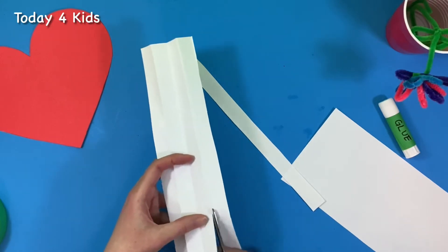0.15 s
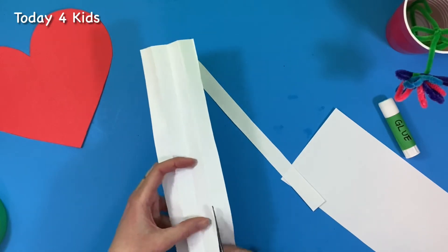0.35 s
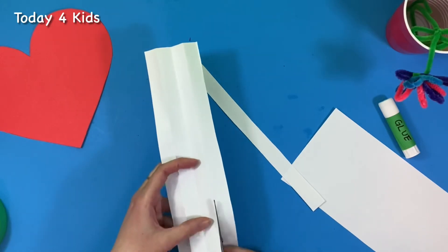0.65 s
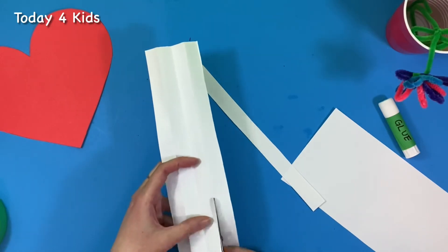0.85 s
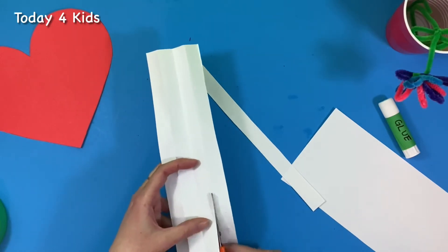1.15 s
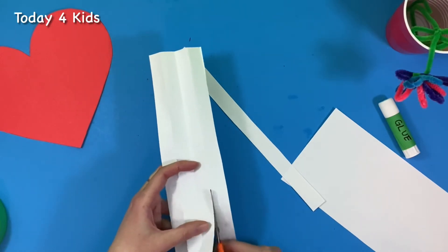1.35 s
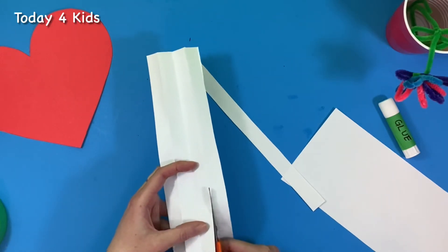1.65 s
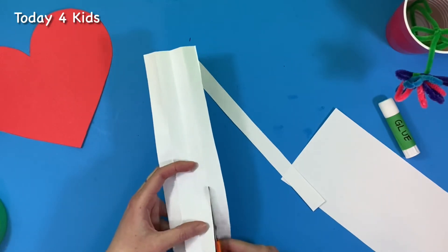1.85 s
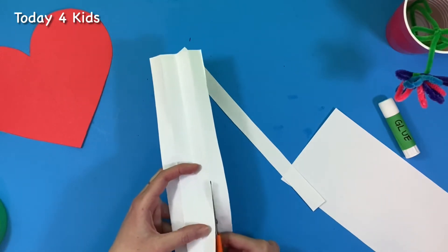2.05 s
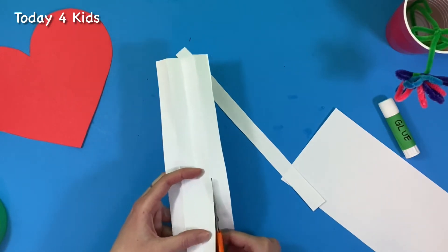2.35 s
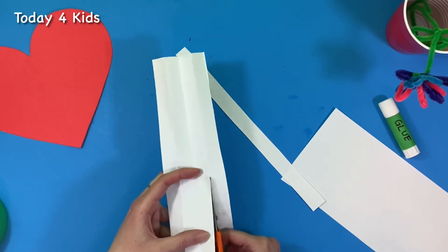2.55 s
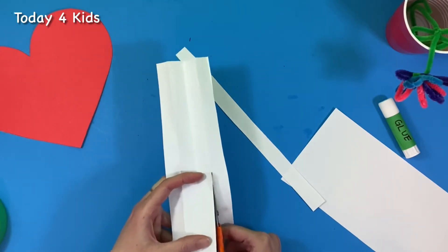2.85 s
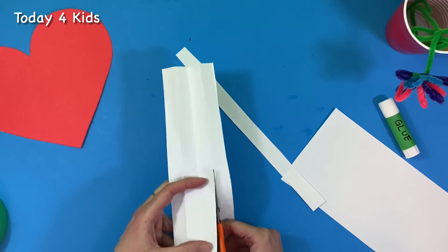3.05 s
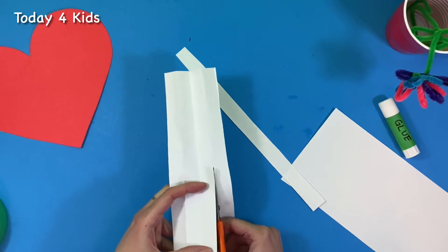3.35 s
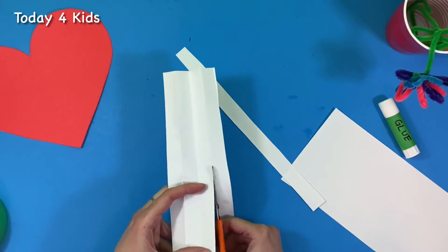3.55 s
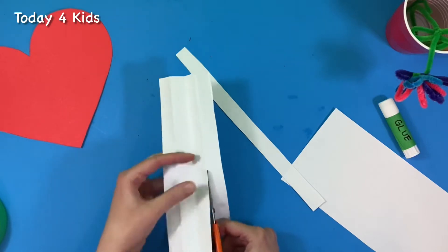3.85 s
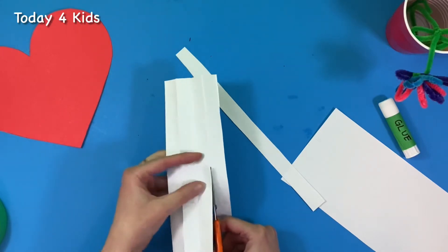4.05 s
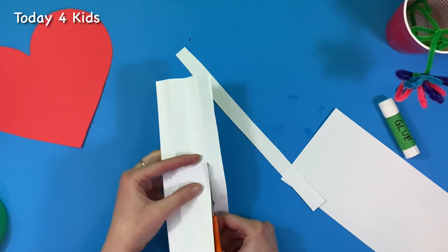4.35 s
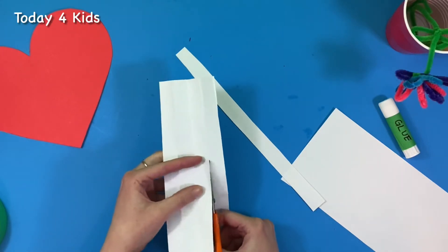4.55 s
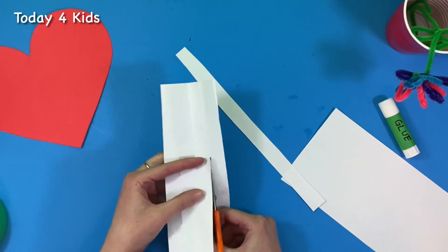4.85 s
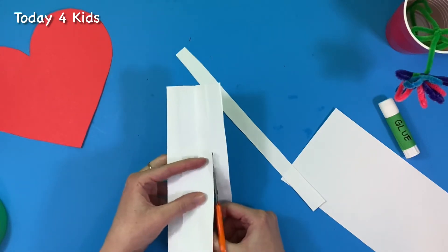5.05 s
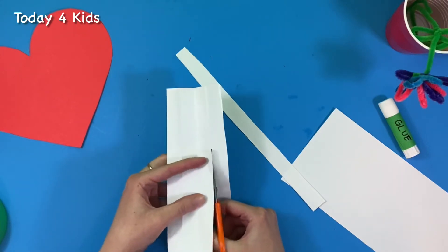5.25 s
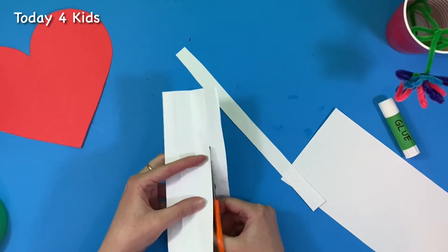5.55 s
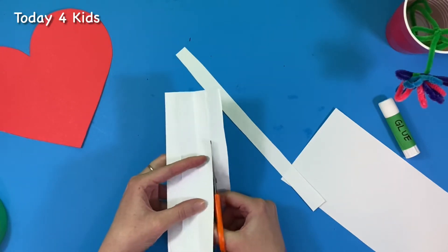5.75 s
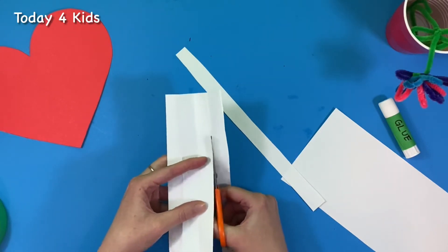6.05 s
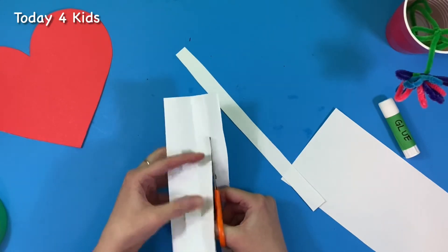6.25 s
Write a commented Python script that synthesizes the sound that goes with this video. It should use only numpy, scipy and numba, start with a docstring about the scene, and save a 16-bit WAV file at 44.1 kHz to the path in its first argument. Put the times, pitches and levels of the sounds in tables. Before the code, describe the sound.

A close, dry stereo sound of scissors working through stiff folded paper on a table in a small room, over faint low rumble. At 0-0.5 s, paper slides and ticks under fingers, then a crunchy cut follows at about 0.5-0.65 s. Crisp snaps gather from 0.8 s, with the loudest crack and a light knock near 1.24 s. From 1.4 to 3.4 s, cuts come nearly three a second: gritty, crackling closes of about a tenth of a second alternate with scratchy openings, and a bright pop lands at 2.3 s. Around 3.45-4.05 s cutting pauses for rustling, soft finger pats and a small knock at 3.7 s. A very short hard snap at 4.05 s leads into renewed cutting, with another at 4.44 s. A deep, soft table thump sounds near 5.15 s, with small edge clicks following. The last cut ends near 5.96 s, leaving light paper sliding until 6.3 s.

```python
"""Scissors cut a strip of folded paper: the blades shear shut through the fibres, then rub open again, about
three times a second. Each stroke is a filtered stream of fibre breaks, with surges where bundles give way.
Stiff folds snap as ragged bursts, the blade edge clicks, paper slides under the fingers and fingertips pat it.
A few knocks boom in the table as decaying modes, over low rumble and faint air noise in a small room.
Two close microphones hear it in stereo."""
import sys
import numpy as np
from scipy import signal
from scipy.fft import rfft, irfft
from scipy.io import wavfile
from scipy.ndimage import uniform_filter1d
from numba import njit

SR = 44100
rng = np.random.default_rng(int(sys.argv[2]) if len(sys.argv) > 2 else 0)


def log_audio(samples):
    """Write samples as a 16-bit WAV file to the path given in sys.argv[1]."""
    # one column per channel
    frames = np.atleast_2d(samples).T
    # limit to full scale, then quantise
    limited = np.clip(frames, -1, 1)
    pcm = np.round(limited * 32767).astype(np.int16)
    wavfile.write(sys.argv[1], SR, pcm)


N = 281666

# All event levels are relative; the stroke trims and the final mix act on them.
# Rumble of the room. Each row: time in seconds, level in dB.
RUMBLE_LEVEL = [(0, -59.5), (2.849, -57.5), (3.0, -69), (3.75, -59), (4.999, -68), (5.35, -52.5),
                (5.75, -70.5), (6.39, -58.5)]
# Spectra of the rumble and of the quiet air. Each row: frequency in Hz, gain in dB.
RUMBLE_SPECTRUM = [(25, -18.5), (55, 1), (75, -4), (97, 0), (140, -14.5), (300, -32.5), (1000, -42)]
AIR_SPECTRUM = [(30, -16), (150, -1.5), (400, -10), (1000, -17.5), (4000, -20.5), (15000, -26)]
AIR_DB = -65
# Modes of the table top. Each row: frequency in Hz, level in dB, 60 dB decay time in seconds.
TABLE_MODES = [(55.8, -38, 0.46), (67, -56, .4), (95.5, -48, 0.42), (103, -25.5, 0.14), (186, -35.5, 0.088)]
# Knocks that reach the table. Each row: start in seconds, level in dB, duration of the push in seconds.
TABLE_KNOCKS = [(1.242, -12.5, 0.0027), (3.712, -12, 0.01), (5.146, 10.5, 0.037)]
# Resonances of paper and scissors over the table. Each row: frequency in Hz, width in Hz, level in dB.
BODY_RESONANCES = [(758, 89, -6.5), (982, 25, -9), (1196, 72, 3), (1717, 43, -2), (1970, 140, -3),
                   (3282, 430, -3.5), (3940, 130, -4)]
# Phase by which the left microphone leads. Each row: frequency in Hz, phase in radians.
LEFT_PHASE_LEAD = [(0, 0), (400, -.2), (900, -.7), (1150, -.2), (1900, .1), (2700, .4), (4400, .35),
                   (5100, .1), (6900, 2.95), (8100, 3.35), (9730, 6.1), (11300, 6.5), (12500, 9.2),
                   (14400, 9.6), (15800, 12.5)]
TOP_HZ = 15900

# Fingers patting the paper on the table. Each row: start in seconds, level in dB, decay in ms, ring in Hz.
FINGER_PATS = [(3.7, -31, 6, 750), (3.7094, -24, 4.6, 380), (3.713, -23, 8.2, 840), (3.722, -33, 10, 990),
               (3.7422, -33.5, 4.3, 1150)]
# Paper sliding under the fingers, and the scrape that trails the big snap at 1.24 s. Each row: start in
# seconds, end in seconds, level in dB, change by the end in dB, ring in Hz, ring level in dB, body level in dB.
PAPER_SLIDES = [(0.128, 0.264, -41.5, 4, 1050, 3, 6), (0.301, 0.465, -35.5, -17.5, 700, 18, -8.5),
                (1.249, 1.355, -24, -31, 4310, 8, -2), (3.451, 3.5, -44.5, 3, 900, -10, 6),
                (3.495, 3.507, -27.5, 2, 2260, 7, -6), (3.534, 3.713, -47, 8, 3600, -11, -29),
                (3.767, 3.881, -44, 12.5, 1850, 7, 2.5), (3.89, 4.092, -35, -5, 950, 13, 1),
                (5.992, 6.233, -37, 0, 825, -4, -5), (6.281, 6.318, -41.5, 2, 1960, -30, 1)]
# Edge catching on a crease. Each row: start in seconds, level in dB.
EDGE_CLICKS = [(0.521, -29), (3.387, -36), (3.4044, -30), (3.42, -24.5), (4.877, -28.5), (5.2197, -25),
               (5.2444, -23), (5.551, -24.5)]
# Snaps of folds and taps on the paper. Each row: start in seconds, level in dB, decay in ms,
# body level in dB, edge level in dB, ring in Hz, ring level in dB.
FOLD_SNAPS = [(.146, -29, 7.2, 6.5, -1, 920, 14), (.169, -29, 1.4, 4, -15, 960, 6),
              (0.2216, -22.5, 6.6, 3.5, 6, 3200, 5), (0.267, -31, 2.8, 7, 0, 700, 5),
              (0.303, -33, 5, 8, 3, 694, 22), (0.332, -27, 1.44, 18, 5, 3250, 10),
              (0.47, -33, 8.7, -6, 6.5, 3370, -16), (0.558, -24.5, 5.5, 6, 0, 3570, -3),
              (0.819, -22.5, 3.5, -10, 1, 1870, 1), (0.8437, -15.5, 6.6, -3.5, -1.5, 1880, -13),
              (0.851, -18, 3.4, 7, -4.5, 1900, -10), (1.007, -17, 4.1, 11, -14, 670, 1.5),
              (1.171, -18, 3.8, 3, -19.5, 790, 8.5), (1.2097, -18, 8.8, 4, 2.5, 2700, 0.5),
              (1.2427, -4.5, 5.33, 4.5, -0.5, 1180, -8), (2.322, -10.5, 2.7, 2.5, -9, 4240, 12.5),
              (2.398, -31, 6.2, 8.5, -5.5, 710, -20), (3.501, -27, 2.7, 0, 2, 2050, 8),
              (3.883, -23.5, 3.6, 9, -48, 1460, 21), (4.0491, -4, 1.26, 1.5, -5.5, 1065, 10),
              (4.4414, -6, 2.84, -12, 0.5, 846, 18), (6.067, -36, 14, 3.5, -8, 720, 15)]
# Blades opening and pushing on. Each row: start in seconds, end in seconds, level in dB,
# sag by the end in dB, ring in Hz, ring level in dB, body level in dB.
BLADE_OPENINGS = [(-.03, 0.067, -33.5, 5, 1570, 0, -2), (0.729, 0.888, -32.5, 4, 1880, 3.5, 3.5),
                  (1.066, 1.205, -33, 12.5, 2000, 2.5, 4.5), (1.368, 1.462, -36.5, 6, 1900, -18, 4),
                  (1.685, 1.842, -28.5, 13, 1700, 3.5, 1), (2.067, 2.194, -31.5, 1.5, 1980, 0, 4.5),
                  (2.412, 2.577, -30.5, 8, 1990, 8.5, 4.5), (2.775, 2.92, -31.5, 4.5, 2100, 0, 3.5),
                  (3.126, 3.244, -32, 9, 1700, -4, 0.5), (4.314, 4.429, -31, 0, 1840, 4, -3),
                  (4.65, 4.806, -36, 5, 2000, -9, -3.5), (5.02, 5.214, -31, 27, 2050, 0.5, 4.5),
                  (5.359, 5.479, -29.5, 4.5, 1850, 5, -1.5), (5.697, 5.823, -29, 11.5, 1850, 11.5, -3)]
# Blades closing through the paper. Each row: start in seconds, end in seconds, level in dB,
# ring in Hz, ring level in dB, body level in dB.
BLADE_CUTS = [(0.482, 0.57, -37, 1230, 15.5, 0.5), (0.566, 0.633, -34.5, 1260, 19, 4.5),
              (0.909, 1.005, -33.5, 1270, 10, 7), (1.496, 1.578, -32, 1140, 7, 0.5),
              (1.867, 1.961, -36, 1100, 9.5, 5.5), (2.254, 2.344, -30, 1070, 8.5, 7.5),
              (2.625, 2.717, -32.5, 1240, 10, 9), (2.969, 3.048, -33, 1270, -1, 7.5),
              (3.314, 3.428, -30.5, 1300, 8.5, 5.5), (3.431, 3.444, -27.5, 765, 2, 24),
              (4.1, 4.228, -32.5, 1160, 8.5, 1.5), (4.513, 4.59, -29.5, 890, 11.5, -10.5),
              (4.869, 4.941, -33.5, 1280, -18, 0), (5.211, 5.283, -28, 1170, -13, 1),
              (5.546, 5.614, -31, 1290, -3, -5), (5.888, 5.962, -29, 1120, -4, -4)]
# Fibre bundles giving way under the closing edge. Each row: time in seconds, level in dB.
FIBRE_BITES = [(0.594, -32), (.608, -33.5), (0.654, -28), (0.918, -29), (.938, -42), (.956, -32.5),
               (1.504, -38), (1.564, -33), (1.585, -30.5), (1.879, -35.5), (1.9, -32), (1.921, -29.5),
               (1.936, -28), (1.96, -31.5), (2.265, -33), (2.284, -31.5), (2.348, -30.5), (2.632, -34.5),
               (2.655, -25.5), (2.671, -31.5), (2.689, -35.5), (2.975, -33), (3.001, -29), (3.019, -32),
               (3.337, -32), (3.359, -37), (3.381, -28.5), (4.115, -31), (4.132, -34), (4.165, -35.5),
               (4.199, -33), (4.551, -30.5), (4.579, -27.5), (4.928, -28), (5.252, -34), (5.279, -31.5),
               (5.605, -32.5), (5.895, -27), (5.912, -26), (5.939, -28)]
# Spectra of the contacts: pat, slide, snap, rub, shear. Each row: frequency in Hz, gain in dB.
PAT_SPECTRUM = [(100, -15), (220, -3.5), (370, -2.5), (560, -8), (850, -2.5), (1300, -13), (2000, -15),
                (5600, -40.5), (15000, -54)]
SLIDE_SPECTRUM = [(100, -13), (300, -11), (650, -5), (1400, -14.5), (2000, -8), (2800, -10), (3500, -6.5),
                  (6900, -5), (10000, -11.5), (15000, -17)]
SNAP_SPECTRUM = [(100, -25), (250, -22.5), (400, -6.5), (780, -5), (1200, -3.5), (2100, 3), (2800, -3.5),
                 (4000, -2.5), (7000, -0.5), (10000, -8.5), (15000, -17.5)]
RUB_SPECTRUM = [(100, -34), (250, -15), (450, -4.5), (750, -1), (1450, -3), (2200, -2), (2700, -8.5),
                (3500, -2.5), (4400, -4.5), (5300, -2), (6900, -1.5), (9500, -8), (15000, -15)]
SHEAR_SPECTRUM = [(100, -31.5), (250, -19.5), (450, -4.5), (750, 1.5), (1500, -2), (2100, 1.5),
                  (2700, -4.5), (3400, 4), (4400, -6), (5300, 1), (6900, 2.5), (9500, -7), (15000, -11)]

FLEX_DB = -3  # waves that return across the sheet
BEND_LAG_S = .001  # lag of bending waves at 1 kHz
LEAD_S = .03  # light touch ahead of a stroke
# Scatter of the ring's pitch and of the density of fibre breaks (natural log units).
RING_WANDER, BUNCHING = .085, .7
# Single fibres: breaks per second, typical ring Hz, ring width Hz, pitch scatter in natural log units.
FIBRE_RATE, FIBRE_HZ, FIBRE_WIDTH_HZ, FIBRE_SCATTER = 95, 2300, 420., .55
# Fibre crackle against the rasp of each kind of stroke (dB).
OPEN_CRACKLE_DB, CUT_CRACKLE_DB, SLIDE_CRACKLE_DB = -15, -8, -15
# Unevenness of a snap and of its flutter (dB); decay time at which the flutter has its usual level (ms).
BURST_RAGGED_DB, TAIL_RAGGED_DB, FLUTTER_FULL_MS = 2.5, 5, 4.5
# Opening: share by which the ring rises, share of the stroke at top speed, softness of the start in dB.
OPEN_GLIDE, OPEN_FASTEST, OPEN_ARCH_DB = 0.054, 0.22, 3
# Closing: share of the stroke at full force, softness of the start in dB.
CUT_FASTEST, CUT_ARCH_DB = 0.45, 2.5
OPEN_RING_WIDTH_HZ, CUT_RING_WIDTH_HZ = 520, 300
BITE_WIDTH_S = 0.0035  # standard deviation of a bite's power in time


def undb(db):
    """Amplitude ratio from decibels."""
    return 10 ** (np.asarray(db) / 20)


def unit(x):
    """Normalisation to an rms value of 1."""
    return x / np.sqrt(np.mean(x ** 2) + 1e-18)


def add(out, s, x):
    """Superposition: mix a sound in at a time in seconds."""
    i = int(s * SR)
    x, i = x[max(-i, 0):], max(i, 0)
    out[i:i + len(x)] += x[:max(N - i, 0)]


def walk(n, rate):
    """Random modulation: levels drawn at a rate per second and joined by lines, spread near 1."""
    at = np.arange(n) * rate / SR
    knots = int(at[-1]) + 2
    return np.interp(at, np.arange(knots), rng.standard_normal(knots)) * np.sqrt(3 / 2)


def colour(x, points):
    """Minimum-phase filtering: a causal response through (Hz, dB) points, by the folded cepstrum."""
    hz, db = np.transpose(points)
    f = np.maximum(np.fft.rfftfreq(4096, 1 / SR), 1)
    gain_db = np.interp(np.log(f), np.log(hz), db)
    cepstrum = irfft(np.log(undb(gain_db)))
    half = len(cepstrum) // 2
    cepstrum[1:half] *= 2
    cepstrum[half + 1:] = 0
    response = irfft(np.exp(rfft(cepstrum)))
    return signal.fftconvolve(x, response)[:len(x)]


def lows(x, hz, order=1):
    """Low-pass filtering: attenuation above a cutoff frequency."""
    return signal.sosfilt(signal.butter(order, min(hz, SR / 2 - 1), fs=SR, output="sos"), x)


def ring(x, hz, width_hz):
    """Simple resonance: one damped mode with gain 1 at its centre."""
    return signal.lfilter(*signal.iirpeak(hz, hz / width_hz, fs=SR), x)


@njit
def moving_ring(x, hz, width_hz):
    """Time-varying resonance: a state-variable mode with a moving centre, gain 1 there."""
    y, band, low = np.empty(len(x)), 0., 0.
    for i in range(len(x)):
        g, k = np.tan(np.pi * hz[i] / SR), width_hz / hz[i]
        v = (band + g * (x[i] - low)) / (1 + g * (g + k))
        band, low, y[i] = 2 * v - band, low + 2 * g * v, k * v
    return y


def background():
    """Stationary and wandering noise: an uneven low rumble under faint steady air noise."""
    rumble_db = np.interp(np.arange(N) / SR, *np.transpose(RUMBLE_LEVEL)) + 0.76 * walk(N, 13)
    rumble = undb(rumble_db) * unit(colour(rng.standard_normal(N), RUMBLE_SPECTRUM))
    air = undb(AIR_DB) * unit(colour(rng.standard_normal(N), AIR_SPECTRUM))
    return rumble + air


def room(x, early_db, early_s, late_db, t60_s, dull_hz):
    """Reverberation: quick reflections from the table and things on it, then the room's short tail."""
    t = np.arange(SR // 2) / SR
    early = rng.standard_normal(len(t)) * (t > .001) * np.exp(-t / early_s)
    late = rng.standard_normal(len(t)) * (t > .008) * np.exp(-np.log(1000) * t / t60_s)
    response = (undb(early_db) * unit(early) + undb(late_db) * unit(late)) / np.sqrt(len(t))
    return lows(signal.fftconvolve(x, response)[:N], dull_hz)


def knocks(shudder_db=-51, shudder_s=0.039):
    """Modal excitation: knocks of hand and scissors set off beating table modes and shudder loose things."""
    out = np.zeros(N)
    for s, knock_db, push_s in TABLE_KNOCKS:
        t = np.maximum(np.arange(N) / SR - s, 0)
        modes = np.zeros(N)
        for hz, db, t60 in TABLE_MODES:
            modes += undb(db) * np.sin(2 * np.pi * hz * t) * np.exp(-np.log(1000) * t / t60)
        shudder = unit(lows(rng.standard_normal(N), 170, order=2))
        shudder = undb(shudder_db) * np.exp(-t / shudder_s) * shudder
        push = np.sin(np.pi / 2 * np.minimum(t / push_s, 1)) ** 2
        out += undb(knock_db) * (modes + shudder) * push
    return out


def flex(x, depth_db, span_s=.0028, rate=22):
    """Interference: waves return across the sheet in milliseconds, in a pattern that shifts as it bends."""
    t = np.arange(int(4 * span_s * SR)) / SR
    returns = rng.standard_normal((2, len(t))) * np.exp(-t / span_s) * (t > .0005)
    returns /= np.linalg.norm(returns, axis=1, keepdims=True)
    a, b = signal.fftconvolve(x[None], returns)[:, :len(x)]
    bend = walk(len(x), rate)
    return x + undb(depth_db) * (np.cos(bend) * a + np.sin(bend) * b)


def disperse(x):
    """Dispersion of bending waves: the treble crosses the sheet first and the bass trails it."""
    khz = np.fft.rfftfreq(len(x), 1 / SR) / 10 ** 3
    # a phase that grows as the root of frequency
    phase = 2 * np.pi * 2 * BEND_LAG_S * 10 ** 3 * np.sqrt(khz)
    return irfft(rfft(x) * np.exp(-1j * phase), len(x))


def crinkle(t, fade_s, rate=260):
    """Random impulses: sparse ticks of settling creases, each with its own size, under a decay."""
    n = len(t)
    ticks = (rng.random(n) < rate / SR) * rng.uniform(-1, 1, n)
    return ticks * np.sqrt(SR / rate) * np.exp(-t / fade_s)


def crackle(t):
    """Impulsive fracture: single fibres snap at random and ring at the pitch of their patch of paper."""
    ticks = crinkle(t, np.inf, FIBRE_RATE)
    hz = FIBRE_HZ * np.exp(FIBRE_SCATTER * np.clip(walk(len(t), FIBRE_RATE), -2, 2))
    ringing = moving_ring(ticks, hz, FIBRE_WIDTH_HZ)
    return unit(flex(ringing + colour(ticks, SHEAR_SPECTRUM) / 10, FLEX_DB))


def steadied(x, span_s=0.025):
    """Level control: unit rms over short spans, as the hand sets the force and fibres the fine grain."""
    return x / np.sqrt(np.abs(uniform_filter1d(x ** 2, int(span_s * SR))) + 1e-18)


def clock(length_s):
    """Time base: seconds since a stroke began, from the light touch before it, and the share done."""
    t = np.arange(int(length_s * SR) + SR // 8) / SR - LEAD_S
    return t, np.clip(t / length_s, 0, 1)


def stroke(t, length_s, spectrum, ring_hz, ring_db, body_db, grain_rate, grain_db, hiss_db, catch_rate,
           catch_db, tilt_db, ring_width_hz, rise_s, fall_s, crackle_db):
    """Stick-slip friction: tiny fibre breaks bunch up as the edge catches and lets go."""
    n = len(t)
    density = grain_rate * np.exp(BUNCHING * walk(n, 110))
    breaks = (rng.random(n) < density / SR) * rng.choice([-1, 1], n)
    grains = breaks * undb(grain_db * np.minimum(rng.exponential(size=n), 4))
    # the edge sticks and slips at an unsteady rate
    catch_hz = catch_rate * np.exp(BUNCHING / 2 * walk(n, catch_rate))
    chatter = np.sin(2 * np.pi * np.cumsum(catch_hz) / SR)
    force = (unit(grains) + undb(hiss_db) * rng.standard_normal(n)) * undb(catch_db * chatter)
    x = flex(colour(force, spectrum), FLEX_DB)
    # the free length of paper sets a broad ring that wanders and swells as it flexes
    swell_db = ring_db - 1 + 3 * np.tanh(walk(n, 55))
    wandering_hz = ring_hz * np.exp(RING_WANDER * walk(n, 45))
    x = x + undb(swell_db) * moving_ring(x, wandering_hz, float(ring_width_hz))
    # paper pressed to the table adds body, which comes and goes with the grip
    x = colour(x, [(600, body_db), (1700, 0.004)])
    grip = undb(tilt_db * np.tanh(walk(n, 47.4)))
    x = x + (grip - 1) * lows(x, 1200)
    onset = (1 + np.tanh(t / rise_s - .5)) / 2
    release = np.exp(-np.maximum(t - length_s, 0) / fall_s)
    return (steadied(x) + undb(crackle_db) * crackle(t)) * onset * release


def pats(rise_s=0.0016, ring_db=7, crinkle_db=-10):
    """Air displacement: fingertips each press a dull puff out of the loose paper and crinkle it."""
    out, t = np.zeros(N), np.arange(SR // 10) / SR
    for s, db, decay_ms, ring_hz in FINGER_PATS:
        decay = np.exp(-np.maximum(t - rise_s, 0) * 10 ** 3 / decay_ms)
        envelope = np.minimum(t / rise_s, 1) * decay
        puff = envelope * rng.standard_normal(len(t))
        x = colour(puff + undb(crinkle_db) * crinkle(t, 2 * decay_ms / 10 ** 3), PAT_SPECTRUM)
        x = unit(x + undb(ring_db) * ring(x, ring_hz, ring_hz / 3))
        add(out, s, undb(db) * np.sqrt(np.mean(envelope ** 2)) * x)
    return out


def slides(trim_db=-4.5):
    """Sliding friction: paper moves under the fingers or scrapes on after a snap, swelling or dying away."""
    out = np.zeros(N)
    for start, end, db, change_db, ring_hz, ring_db, body_db in PAPER_SLIDES:
        t, done = clock(end - start)
        x = stroke(t, end - start, SLIDE_SPECTRUM, ring_hz, ring_db, body_db,
                   grain_rate=1600, grain_db=0.5, hiss_db=-2, catch_rate=100.0, catch_db=-0.5, tilt_db=8.0,
                   ring_width_hz=630, rise_s=0.0067, fall_s=0.019, crackle_db=SLIDE_CRACKLE_DB)
        add(out, start - LEAD_S, x * undb(trim_db + db + change_db * done))
    return out


def snap(db, decay_ms, body_db, edge_db, ring_hz, ring_db, rise_s=0.00068, tail_db=-12, tail_s=0.0065,
         tail_hz=1200, crinkle_db=-19, ring_share=0.15):
    """Buckling: a ragged burst rings its panel of paper, trailed by a dull flutter and small ticks."""
    t = np.arange(SR // 10) / SR
    rise = np.minimum(t / rise_s, 1)
    burst = rise * np.exp(-t * 10 ** 3 / decay_ms)
    crack = rng.choice([-1., 1.], len(t)) * burst * undb(BURST_RAGGED_DB * walk(len(t), 700))
    flutter = ring(rng.standard_normal(len(t)), tail_hz, tail_hz) * rise * np.exp(-t / tail_s)
    flutter *= undb(tail_db + TAIL_RAGGED_DB * walk(len(t), 310))
    trail = flutter + undb(crinkle_db) * crinkle(t, 2 * tail_s)
    # a shorter snap leaves less flutter
    x = colour(crack + np.sqrt(decay_ms / FLUTTER_FULL_MS) * trail, SNAP_SPECTRUM)
    x = colour(x, [(650, body_db), (1700, 0.0029), (2000, 0.0024), (5000, edge_db)])
    x = x + undb(ring_db) * ring(x, ring_hz, ring_share * ring_hz)
    return unit(disperse(x)) * np.sqrt(np.mean(burst ** 2)) * undb(db)


def snaps():
    """Sudden release: the stiff folds snap and the fingers tap the paper."""
    out = np.zeros(N)
    for s, *blow in FOLD_SNAPS:
        add(out, s, snap(*blow))
    return out


def clicks():
    """Catch and release: the steel edge lets go of a crease with a short bright click."""
    out = np.zeros(N)
    for s, db in EDGE_CLICKS:
        add(out, s, snap(db, decay_ms=2.6, body_db=-5.5, edge_db=5.0, ring_hz=3300, ring_db=-1))
    return out


def openings(trim_db=-2.14):
    """Rubbing friction: the blades rub along the paper, quickest early on, slowing as the hand opens."""
    out = np.zeros(N)
    for start, end, db, sag_db, ring_hz, ring_db, body_db in BLADE_OPENINGS:
        t, done = clock(end - start)
        start_loss_db = OPEN_ARCH_DB * np.maximum(1 - done / OPEN_FASTEST, 0) ** 2
        end_loss_db = sag_db * np.maximum((done - OPEN_FASTEST) / (1 - OPEN_FASTEST), 0) ** 2
        rising_hz = ring_hz * (1 + OPEN_GLIDE * (done - .5))
        x = stroke(t, end - start, RUB_SPECTRUM, rising_hz, ring_db, body_db,
                   grain_rate=3500, grain_db=2.5, hiss_db=-3.0, catch_rate=210.0, catch_db=1.0, tilt_db=3.5,
                   ring_width_hz=OPEN_RING_WIDTH_HZ, rise_s=0.0057, fall_s=0.016,
                   crackle_db=OPEN_CRACKLE_DB)
        add(out, start - LEAD_S, x * undb(trim_db + db - start_loss_db - end_loss_db))
    return out


def bites(t, start, end):
    """Successive fracture: force surges as the closing edge goes through one fibre bundle after another."""
    times, db = np.transpose(FIBRE_BITES)
    inside = (times > start - LEAD_S) & (times < end + LEAD_S)
    pulses = np.exp(-.5 * ((start + t[:, None] - times) / BITE_WIDTH_S) ** 2)
    return np.sqrt(np.sum(inside * undb(db) ** 2 * pulses, axis=1))


def cuts(trim_db=-4.5, bite_db=-1.47, bite_ring_db=-8):
    """Shear fracture: the blades close, hardest in mid-stroke; each bite surges and leaves the paper ringing."""
    out = np.zeros(N)
    for start, end, db, ring_hz, ring_db, body_db in BLADE_CUTS:
        t, done = clock(end - start)
        x = stroke(t, end - start, SHEAR_SPECTRUM, ring_hz, ring_db, body_db,
                   grain_rate=1900, grain_db=1.5, hiss_db=-9.0, catch_rate=220, catch_db=0.5, tilt_db=1.0,
                   ring_width_hz=CUT_RING_WIDTH_HZ, rise_s=0.0046, fall_s=0.016,
                   crackle_db=CUT_CRACKLE_DB)
        steady = undb(trim_db + db - CUT_ARCH_DB * (1 - done / CUT_FASTEST) ** 2)
        surge = undb(bite_db) * bites(t, start, end)
        bite_hz = ring_hz * np.exp(2 * RING_WANDER * walk(len(t), FIBRE_RATE / 2))
        bite_ring = undb(bite_ring_db) * moving_ring(x * surge, bite_hz, ring_hz / 4)
        add(out, start - LEAD_S, x * np.hypot(steady, surge) + bite_ring)
    return out


def scene():
    """Superposition: all handwork rings one paper in one room; the microphones catch different sheet waves."""
    work = undb(2.5) * snaps() + clicks() + pats() + openings() + cuts() + slides()
    resonances = sum(undb(db) * ring(work, hz, width) for hz, width, db in BODY_RESONANCES)
    work = undb(-1.5) * (work + resonances)
    mid_room = room(work, early_db=-23, early_s=0.017, late_db=-18.0, t60_s=0.22, dull_hz=7000)
    mid = work + mid_room + knocks() + background()
    side_room = room(work, early_db=-13.0, early_s=0.00053, late_db=-23, t60_s=0.27, dull_hz=3780)
    sheet_waves = flex(work, depth_db=-17.5) - work
    side_noise = undb(-66) * unit(lows(rng.standard_normal(N), 700))
    side = side_room + sheet_waves + side_noise
    return np.array([mid + side, mid - side])


def record(dry):
    """Phase and band limits: the microphones drift apart in phase in the treble; peaks clip, the top is cut."""
    phase = np.interp(np.fft.rfftfreq(N, 1 / SR), *np.transpose(LEFT_PHASE_LEAD))
    pair = irfft(rfft(dry) * np.exp(.5j * np.array([phase, -phase])), N)
    low_pass = signal.ellip(8, .2, 70, TOP_HZ, fs=SR, output="sos")
    return signal.sosfilt(low_pass, np.clip(pair, -1, 1))


dry = scene()
out = record(dry)
log_audio(out)
```